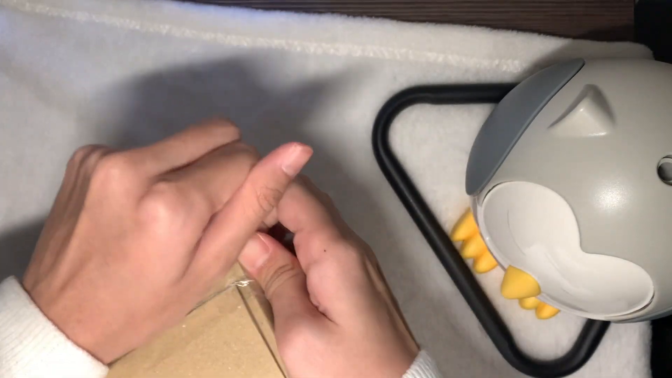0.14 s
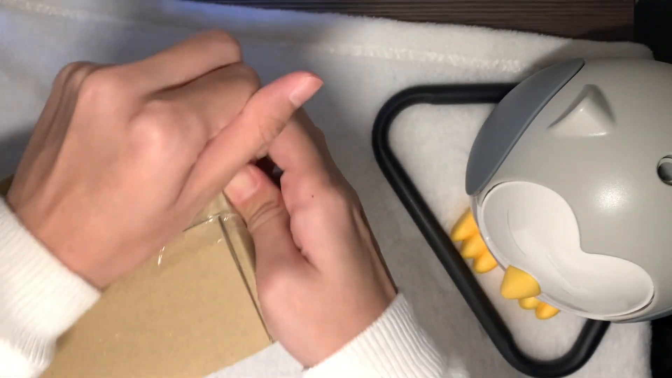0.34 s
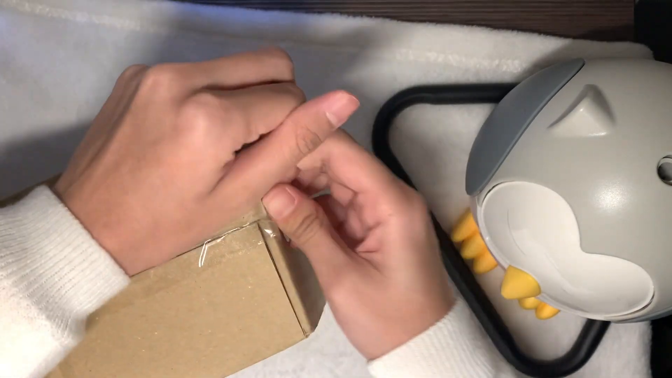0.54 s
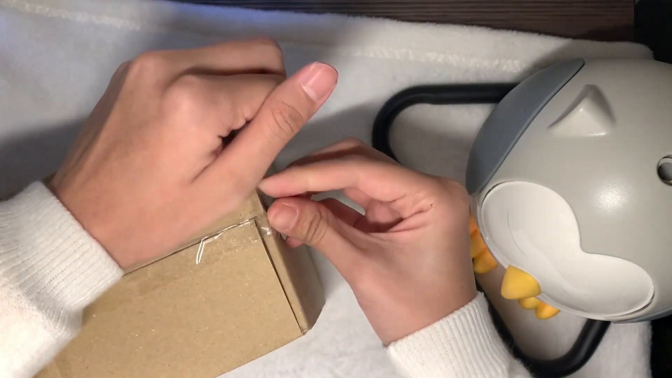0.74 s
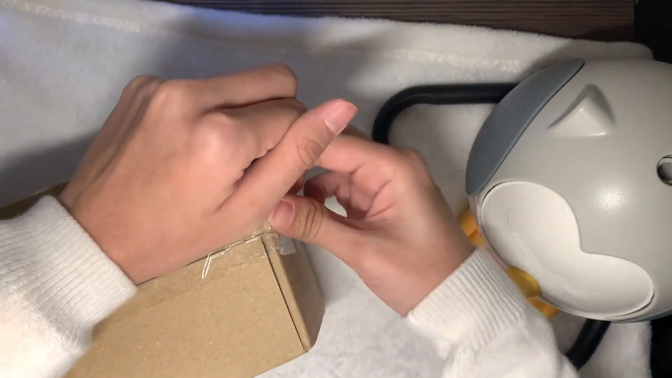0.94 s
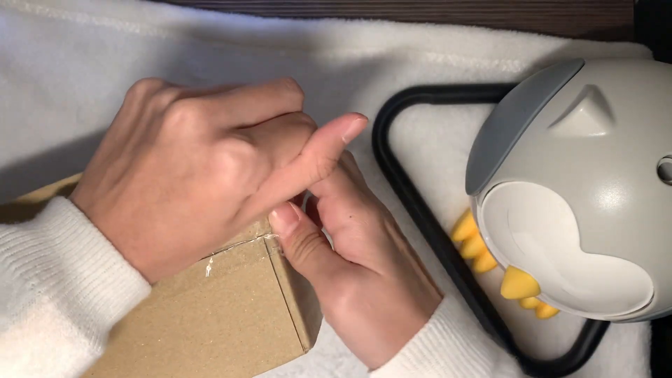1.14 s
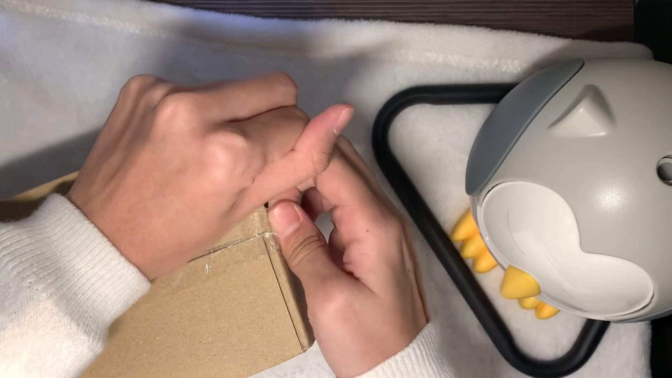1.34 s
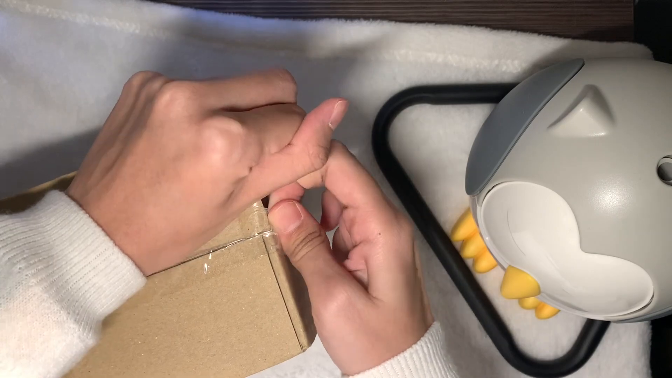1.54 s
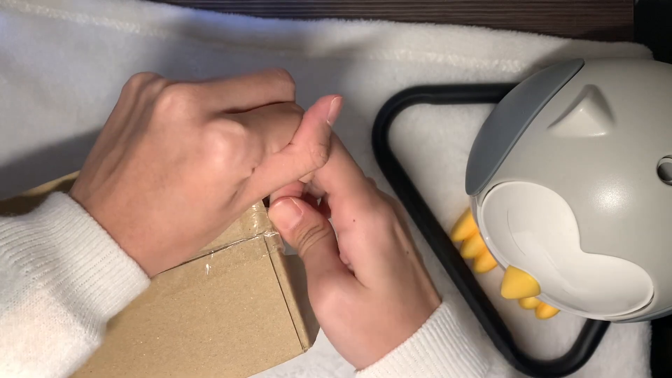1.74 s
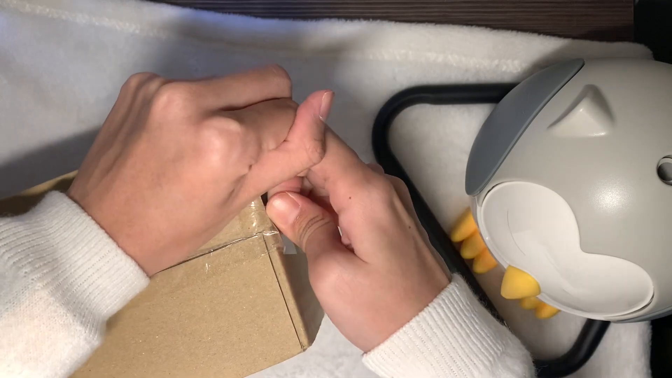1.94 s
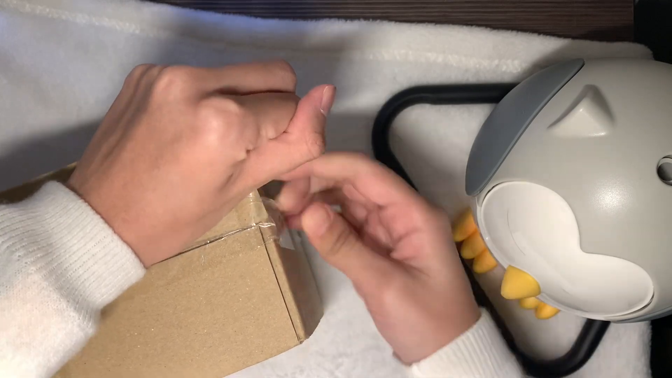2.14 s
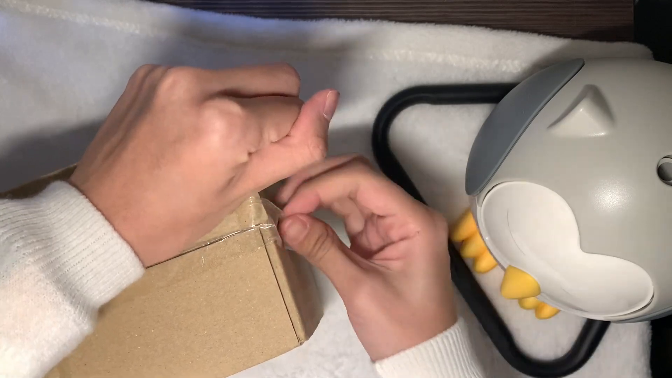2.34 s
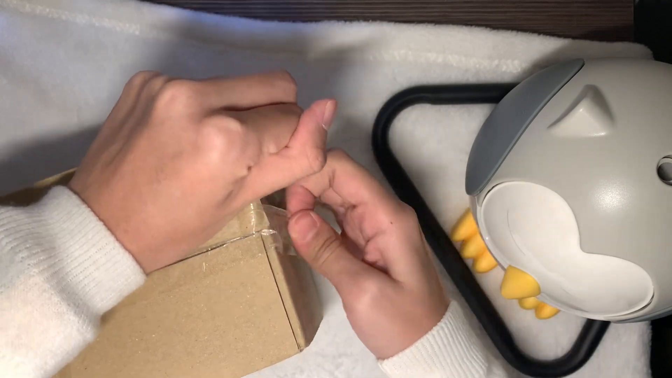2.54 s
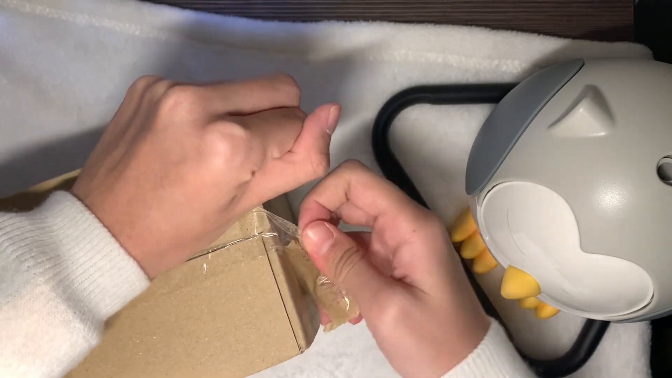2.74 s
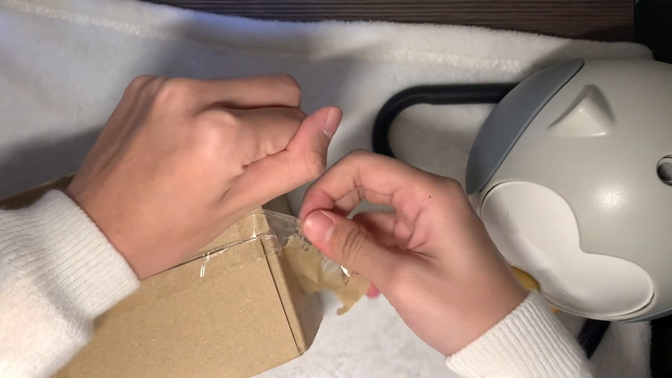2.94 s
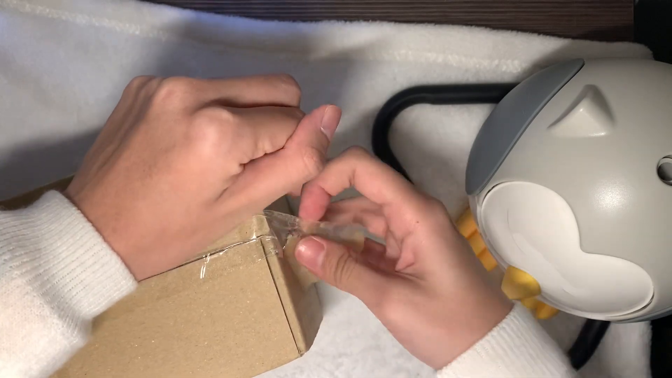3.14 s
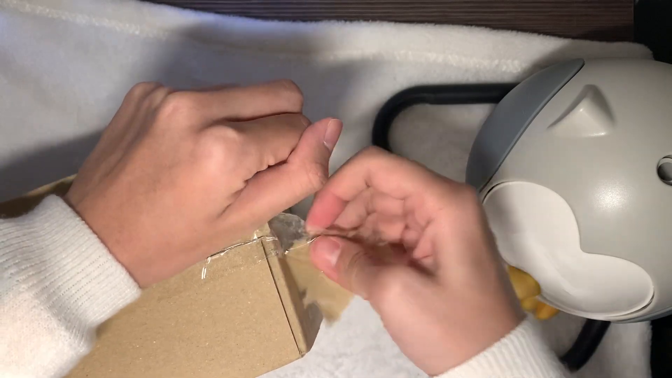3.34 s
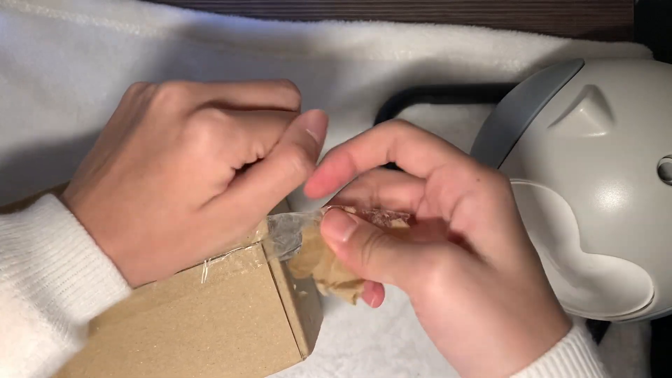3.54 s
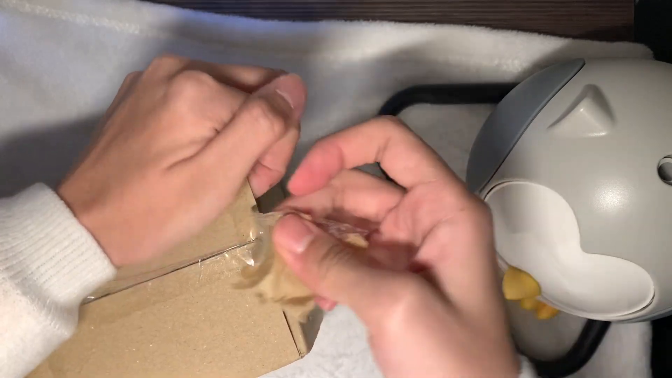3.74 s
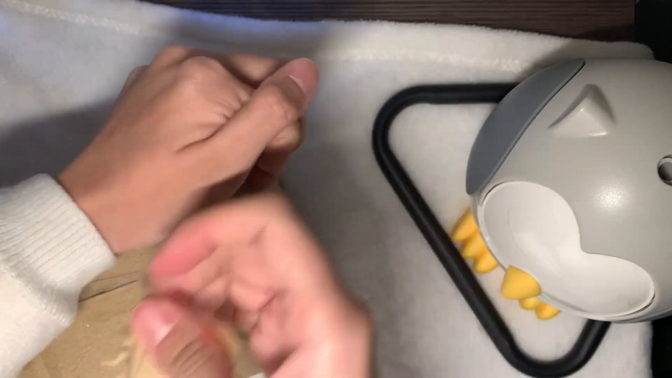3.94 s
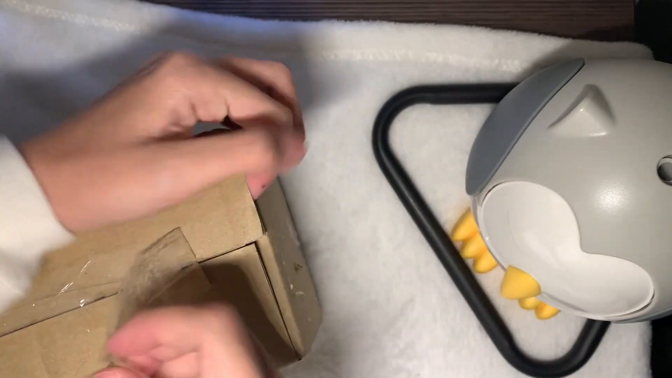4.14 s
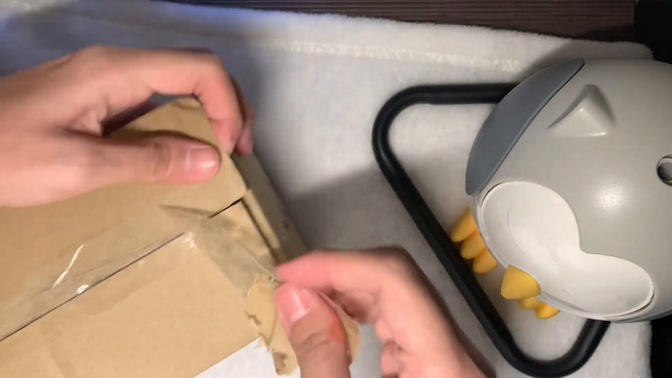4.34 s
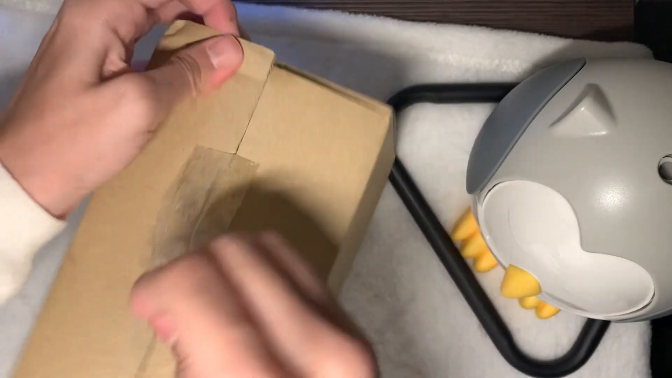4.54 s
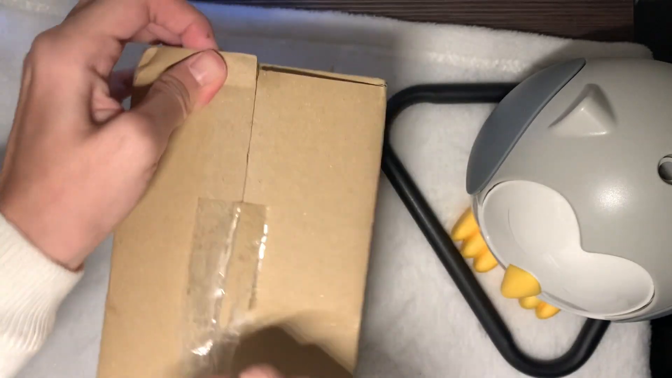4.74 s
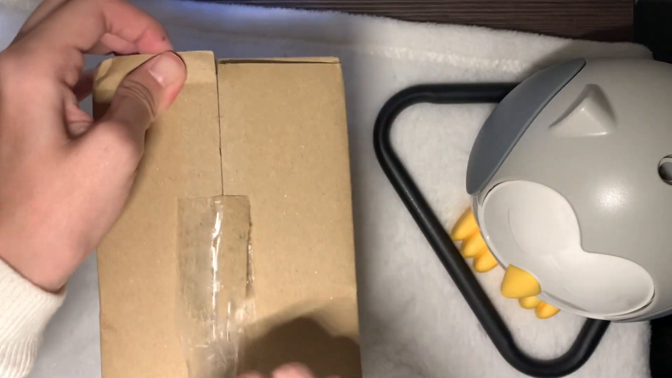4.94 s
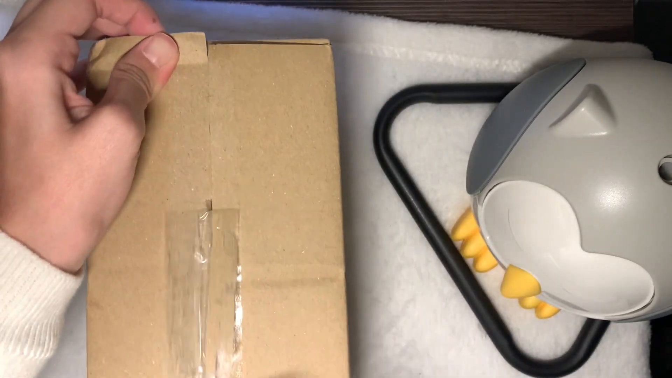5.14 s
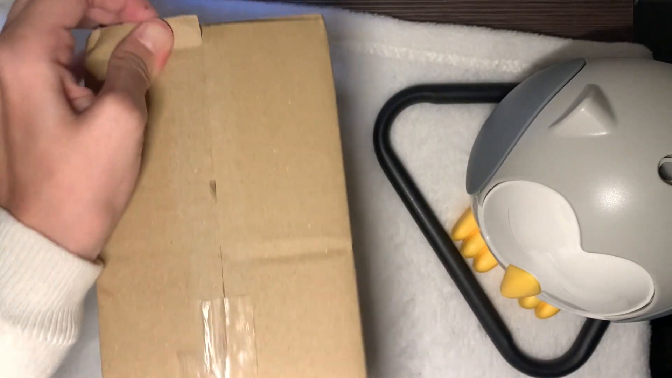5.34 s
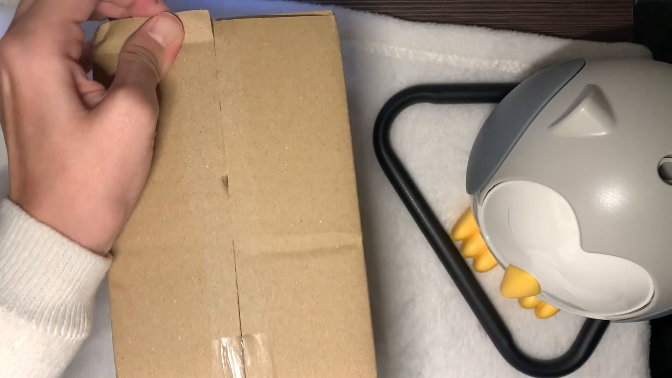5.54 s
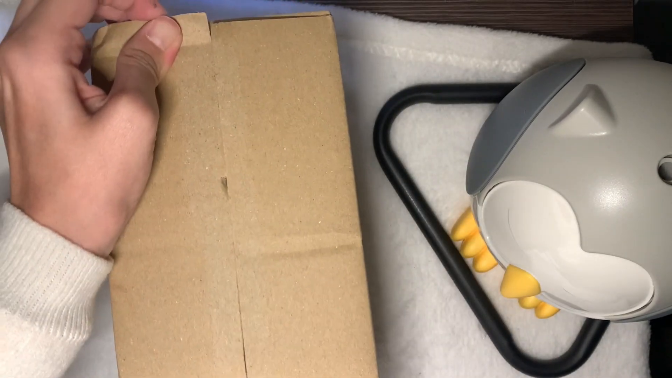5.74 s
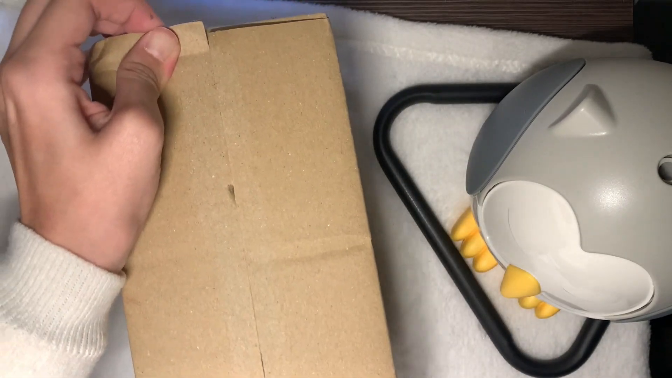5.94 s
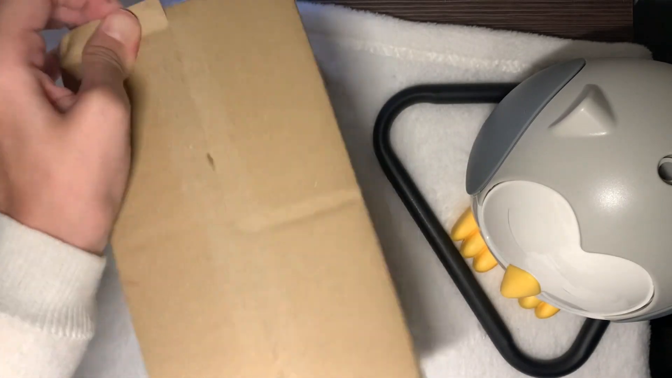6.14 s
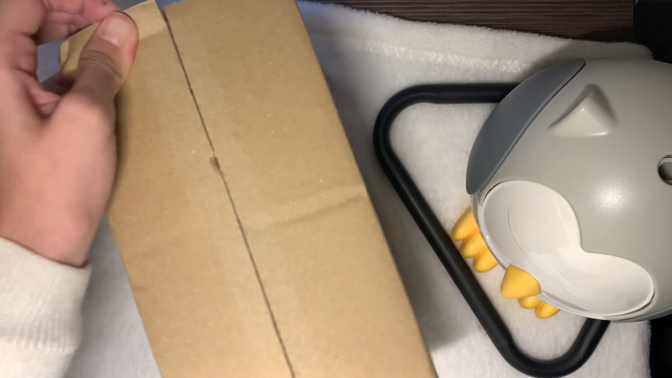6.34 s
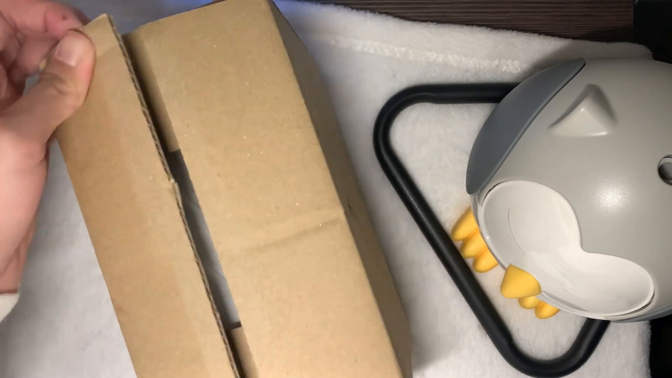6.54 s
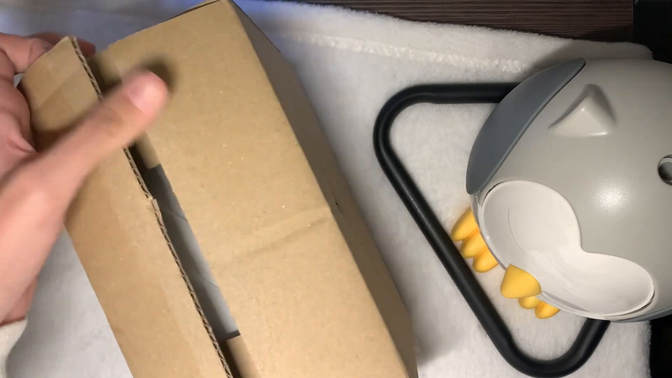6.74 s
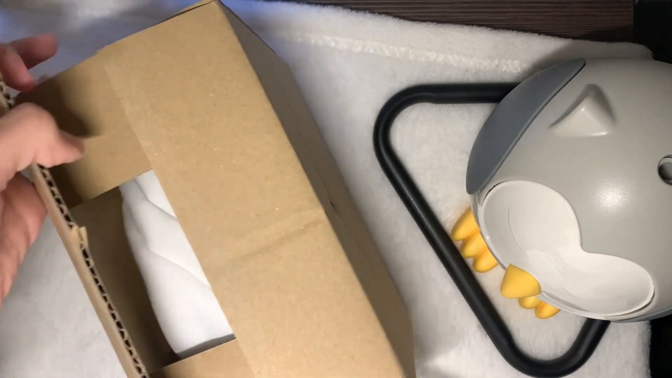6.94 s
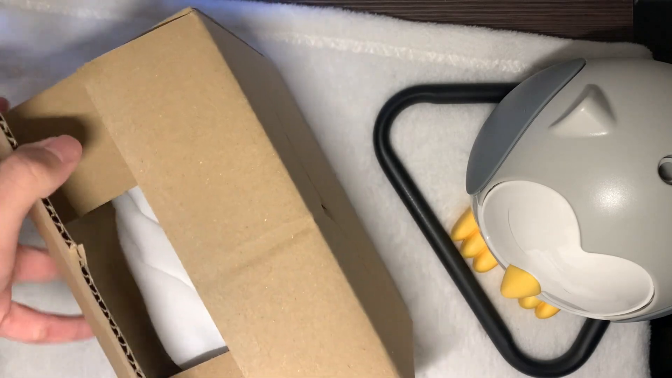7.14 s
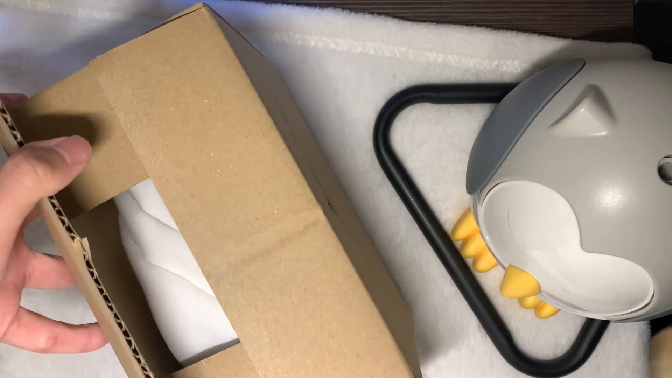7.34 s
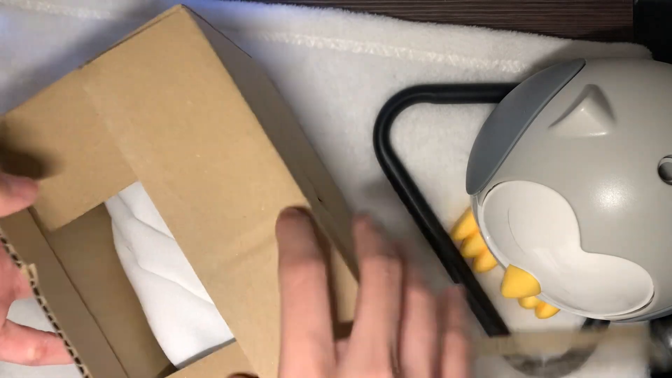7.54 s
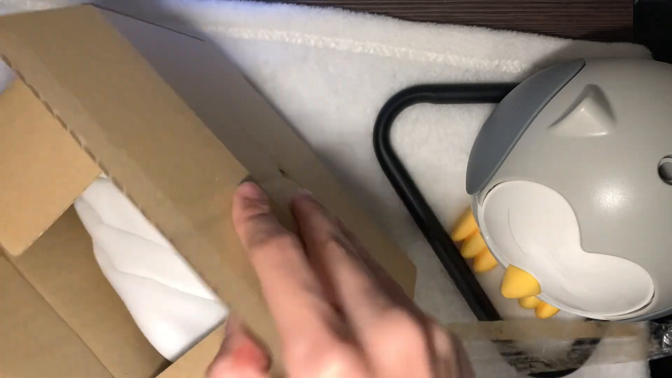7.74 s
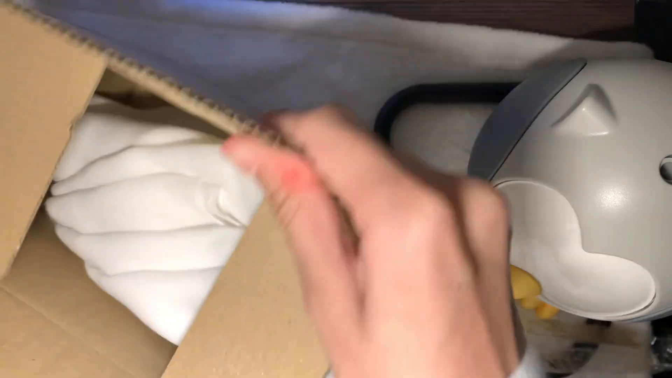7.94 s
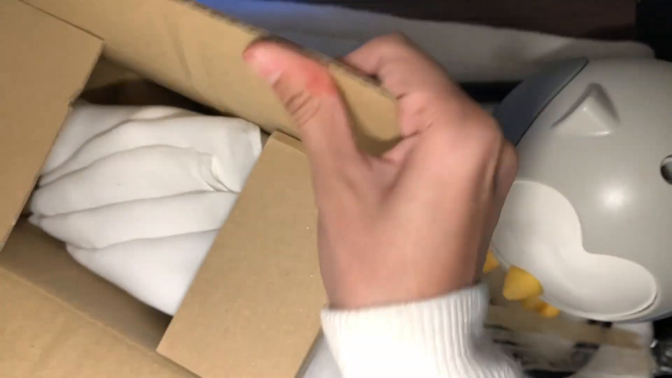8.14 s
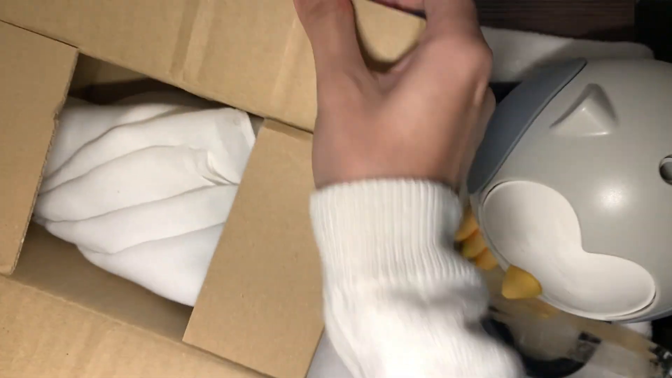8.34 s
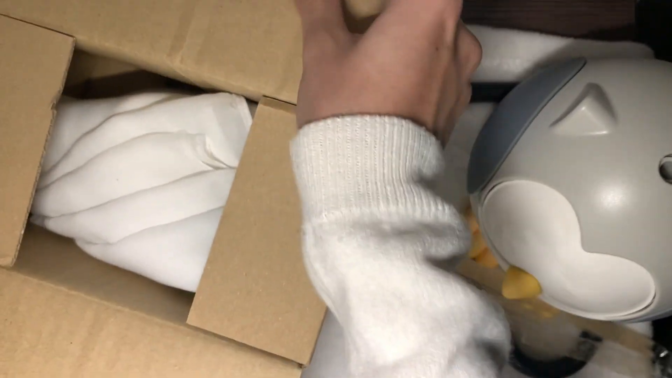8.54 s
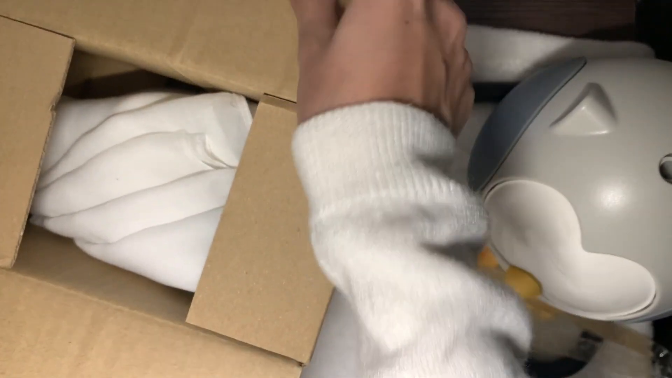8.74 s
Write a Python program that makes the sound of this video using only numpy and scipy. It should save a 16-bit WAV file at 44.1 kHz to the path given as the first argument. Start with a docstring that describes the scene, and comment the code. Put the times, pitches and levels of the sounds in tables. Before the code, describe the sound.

Hands work on a small cardboard box close to the microphone, in a small, soft room with a steady low hum. For the first 2.4 seconds, fingers rub and tap the cardboard while nails pick at packing tape with small, crisp ticks. Short rips follow at about 2.5, 3.2, 3.8 and 4.4 seconds, each a high, raspy fizz that drums on the hollow box, with knocks and snapping creases in between. From 5 seconds a longer, slower peel crackles along, with a sharp snap near 5.4, ending in two quick rips and thumps around 6 seconds. The loose tape crinkles near 6.5 seconds as the flaps begin to scrape and creak open. A firm cardboard knock and more crackles come at 7.5 seconds. The folds creak faintly around 8 seconds, and softer rubbing and light bumps continue until nearly 9 seconds.

```python
"""A small, soft room with a low hum. Close by, hands pick at the packing tape of a small cardboard box,
rip it off in several pulls and fold the flaps open. The glue lets go in tiny slips that fizz in the
film and drum on the board and lid. Creases in the loose tape snap, and the strip scratches over nails
and edges. Fingers and flaps rub and knock on the cardboard, and the folds creak as they bend back."""
import sys
import numpy as np
from scipy import signal
from scipy.fft import rfft, irfft, next_fast_len
from scipy.io import wavfile
from scipy.ndimage import uniform_filter1d

SR = 44100
rng = np.random.default_rng(int(sys.argv[2]) if len(sys.argv) > 2 else 0)


def int16_out(signal):
    """Quantize to a 16-bit WAV file."""
    q = np.round(np.clip(np.atleast_2d(signal).T, -1, 1) * 32767)
    wavfile.write(sys.argv[1], SR, q.astype(np.int16))


N = 387638

# Levels in the tables are relative; each layer sets its own trim.
# room tone: (frequency [Hz], level [dB])
AIR_EQ = [(20, -48), (45, 13), (70, 31), (120, -2.5), (200, -18), (420, 13.5), (700, -7.5), (1100, -4.5),
          (2000, -8.5), (4000, -20), (8000, -60), (16000, -48)]
# how two microphone ports differ: (frequency [Hz], phase lead of the left [rad], direct share [0-1])
PORT_PHASES = [(0, 0.1, 0), (480, 0.41, 0.2), (970, -0.83, .5), (1500, -1.61, 0.3), (2040, -1.89, .2),
               (2750, -2, 0), (3350, -1.63, 0.2), (5340, -1.64, .1), (6230, 0.5, .6), (9534, 3, .7),
               (13180, 6.5, 0.6), (16200, 8.5, .7)]
# tone of sliding skin, paper liner, a flipping crease and peeling film: (frequency [Hz], level [dB])
SKIN_EQ = [(700, -24), (2000, -9), (2800, -5.5), (4800, -7.5), (6300, -2), (8200, 5.5), (10000, 2.5),
           (11200, 10), (13000, 10), (14500, 12), (15700, 9), (16500, -25)]
PAPER_EQ = [(600, 8), (1100, 8.5), (2000, 10), (2800, 4), (4500, -2), (7000, 2), (10000, -18), (15000, -30)]
CREASE_EQ = [(700, -65), (2000, -15), (2800, -11.5), (4000, -3.5), (6300, 7.5), (8200, 16), (9800, 16.5),
             (11500, 14.5), (13000, 16.5), (15500, 14), (16800, -10)]
FILM_EQ = [(900, -73), (2000, 1), (2700, -11), (3600, -19.5), (5000, -22.5), (6300, -3), (8200, 5),
           (9200, 1), (10200, 1.5), (11200, 10), (13000, 9), (14500, 10.5), (15700, 4.5), (16500, -42)]
# resonances of the stiff board with the air inside, the flexing lid and a free flap:
# (frequency [Hz], bandwidth [Hz], level [dB])
BOARD_MODES = [(357.6, 78, 5.5), (427.2, 38.7, 12), (497.3, 26, 2), (611.6, 24.7, 2), (792, 58, -2.5),
               (975, 59, -1.5), (1190, 370, -13), (1439, 42, -4.5), (1994, 64, -10)]
LID_MODES = [(88, 19.4, 6), (128, 33.4, 3.5), (172, 20.4, 1.5), (209.2, 18.3, 4.5), (296, 103, -8)]
FLAP_MODES = [(216, 81, 13.5), (420, 60, -9.5), (622, 30, 1.5), (803, 43, 8), (1050, 94, 2),
              (1470, 38, 4.5), (2026, 103, 1)]
# narrow, wavering 3-6 kHz tones that give the peel a pitched rasp:
# (frequency [Hz], bandwidth [Hz], level [dB])
RASP_TONES = [(3255, 57, 0), (3623, 23, 3.5), (4020, 82, 0.5), (4520, 120, -3.5), (4840, 71, -0.5),
              (5390, 92, 1.5), (5970, 100, 3)]
# ring of a creaking fold and of scratched tape: (multiple of the pitch, bandwidth [Hz], level [dB])
FOLD_PARTIALS = [(.55, 90, -5.5), (1, 68.4, 7.5), (1.33, 110, -6), (1.86, 90, -3), (2.6, 160, -4)]
STRIP_PARTIALS = [(1, 188, 10), (1.19, 260, 5.5), (1.45, 300, 0), (1.9, 700, -15)]
# skin, sleeves and flaps brushing cardboard: (start [s], length [s], hiss [dB], board [dB], lid [dB])
STROKE_CUES = [(-0.002, 0.045, -72, -37, -60), (0.062, 0.16, -43, -56.5, -57.5),
               (0.913, 0.18, -47, -51, -51.5), (1.243, 0.35, -66, -50, -50.5),
               (1.51, 0.23, -30, -45.5, -49.5), (1.779, 0.16, -36, -51, -65), (2.047, 0.12, -42, -45, -42),
               (2.197, 0.39, -41, -47, -48.5), (2.26, 0.11, -38, -32, -42),
               (2.619, 0.057, -32.5, -41, -54.5), (2.74, 0.1, -43, -51, -67),
               (3.487, 0.1, -43.5, -46.5, -46.5), (3.668, 0.23, -46, -55.5, -54),
               (3.923, 0.048, -30.5, -51, -44), (4.043, 0.3, -42.5, -49.5, -52),
               (4.366, 0.15, -35, -53, -54), (4.643, .10, -56, -47, -50), (6.19, 0.23, -51, -51, -50),
               (6.37, 0.25, -45, -61, -54.5), (6.718, 0.088, -36, -48, -43), (6.84, 0.086, -38.5, -64, -55),
               (6.958, 0.17, -39.5, -62, -63), (7.462, 0.21, -41.5, -45.5, -44),
               (7.659, 0.56, -38.5, -49, -45.5), (8.249, 0.17, -45, -49.5, -48),
               (8.56, 0.19, -40, -50.5, -64)]
# the resting grip eases or firms: (time [s], half length [s], level change [dB])
GRIP_CUES = [(0.697, 0.082, -8), (4.866, 0.08, 4), (7.36, 0.19, -5.5)]
# fingers and flaps bumping the box: (time [s], panel swing [dB], settled pitch [Hz], ring [dB])
KNOCK_CUES = [(0.025, -35, 420, -33), (0.09, -37, 118, -29), (0.131, -39, 440, -31), (0.822, -33, 315, -28),
              (0.948, -26.5, 360, -35), (1.121, -43, 407, -27.5), (1.165, -32.5, 220, -32.5),
              (1.253, -55, 300, -31), (1.34, -45, 364, -28.5), (1.438, -47, 414, -31),
              (1.518, -32, 414, -23.5), (1.645, -20.5, 386, -32), (2.12, -37, 436, -18.5),
              (2.127, -23, 198, -34), (2.277, -22, 361, -35), (2.473, -19.5, 517, -24),
              (2.566, -15, 520, -8.5), (2.852, -31.5, 278, -30), (2.947, -40, 124, -26),
              (3.086, -16, 348, -28), (3.097, -22.5, 420, -46), (3.122, -15, 410, -42),
              (3.152, -25, 407, -12), (3.274, -16, 497, -18.5), (3.476, -27, 195, -23.5),
              (3.671, -27.5, 335, -26), (3.838, -33, 280, -21.5), (3.868, -15, 245, -19.5),
              (3.881, -21.5, 85.6, -43), (4.116, -31.5, 116, -40), (4.288, -28.5, 107, -26.5),
              (4.479, -7.5, 312, -14), (4.522, -12, 165, -41), (4.56, -22, 90.5, -45),
              (4.688, -27.5, 330, -35), (5.197, -10.5, 199, -28), (5.237, -16, 298, -20),
              (5.265, -20, 380, -32), (5.289, -17, 445, -16.5), (5.424, -13, 152, -48),
              (5.636, -19.5, 138, -44), (6.042, -10, 142, -26), (6.076, -22, 138, -33),
              (6.135, -5, 397, -28), (6.455, -61, 436, -23.5), (6.607, -14.5, 136, -41),
              (6.734, -22.5, 136, -36), (6.903, -52, 388, -36), (7.495, -8, 219.6, -14.5),
              (7.504, -17.5, 141, -34), (7.528, -15.5, 180, -22), (7.648, -27, 226, -25.5),
              (8.037, -29.5, 152, -26), (8.121, -28, 209, -31.5), (8.391, -29.5, 294, -30.5)]
# folds creaking and tape scratching: (peak time [s], build [s], level [dB], pitch [Hz])
CREAK_CUES = [(6.603, 0.0021, -37, 1000), (6.79, 0.014, -53, 1090), (6.906, 0.0026, -46.5, 1110),
              (7.62, 0.0052, -44, 770), (7.638, 0.005, -41, 820), (7.652, 0.0044, -38, 753),
              (7.73, 0.01, -47, 825), (7.762, 0.015, -43, 640), (8.004, 0.0084, -46.5, 820),
              (8.04, 0.0055, -42.5, 830), (8.062, 0.0046, -50, 780), (8.095, 0.0048, -44, 800),
              (8.126, 0.0044, -44, 830), (8.153, 0.004, -48, 802)]
SCRATCH_CUES = [(0.098, 0.0061, -45, 1810), (0.2, 0.0027, -47, 2020), (1.124, 0.0025, -48, 1970),
                (1.17, 0.0017, -41.5, 1930), (1.343, 0.0014, -44, 1950), (1.648, 0.0023, -38, 3320),
                (1.825, .002, -43, 3300), (2.128, 0.0045, -31, 1440), (2.484, 0.0076, -37.5, 4200),
                (2.511, 0.017, -39.5, 3470), (3.865, .012, -34.5, 1380), (5.946, 0.0044, -38.5, 1540),
                (6.078, 0.0072, -38, 2000), (6.588, 0.0028, -47, 3140), (7.607, 0.0042, -46.5, 4160),
                (8.768, 0.013, -46.5, 1480)]
# creases snapping, nails catching an edge:
# (time [s], crack [dB], pitch [Hz], board [dB], shiver share before limiting [0-1])
SNAP_CUES = [(0.199, -44, 12000, -39.5, 0.6), (0.237, -41, 12000, -39, 0), (0.281, -35, 10000, -38.5, 0.8),
             (0.32, -39, 10000, -57, 0.4), (0.494, -48, 12500, -58, 0.4), (0.536, -44, 12000, -40, 0.6),
             (0.586, -44, 12000, -41.5, 0.9), (0.604, -39, 12100, -64, 0.5), (0.822, -44, 12000, -42, 0.6),
             (0.8446, -30, 12200, -35, 1), (0.9205, -29, 13600, -69, 0), (0.978, -37, 11500, -66, 0),
             (1.058, -32.5, 11000, -60, 0.4), (1.086, -28, 10000, -66, 0.3), (1.123, -42, 11000, -41, 0.4),
             (1.15, -41, 12000, -53, .2), (1.167, -34.5, 8850, -41, 0.9), (1.186, -38, 9000, -44, 0.9),
             (1.2, -37.5, 13500, -58, 0), (1.255, -58, 12000, -38, .2), (1.341, -37.5, 11000, -41, 1),
             (1.441, -57, 12000, -42, .3), (1.52, -21.5, 14100, -59, 0), (1.5359, -15.5, 11100, -56, 0),
             (1.646, -26, 14100, -24.5, 0.4), (1.689, -18, 12900, -57, 0.5),
             (1.824, -23.5, 10200, -55, 0.3), (1.813, -21.5, 11800, -64, 1), (1.878, -26, 13100, -66, .2),
             (1.911, -26.5, 12500, -66, 0.1), (2.0337, -30.5, 14200, -52, 0.8),
             (2.0794, -26, 12000, -62, 0.6), (2.0635, -19, 10000, -32.5, 0.1),
             (2.0993, -22.5, 12700, -44, 0.3), (2.125, -20, 12700, -50, 0), (2.426, -16, 12100, -53, 0.6),
             (2.6952, -10.5, 9900, -39, 0), (2.7237, -22, 11700, -42, 0.7), (2.768, -26, 11000, -47.5, 1),
             (2.9087, -30, 11200, -41, 1), (2.952, -26.5, 13500, -29.5, 0.2), (2.977, -21, 10900, -34.5, 1),
             (3.063, -22, 13100, -31, 0.3), (3.389, -23, 11000, -32.5, 0), (3.475, -27, 12300, -28.5, 0.5),
             (3.5146, -25, 12300, -33, 0), (3.659, -25.5, 14400, -30, 0.5), (3.768, -26, 14400, -42.5, 0.7),
             (3.97, -21, 12000, -35, 0), (4.085, -31, 12000, -35, 0), (4.1196, -21, 12400, -33.5, 0.1),
             (4.162, -29.5, 11900, -44, 0.8), (4.361, -27, 12000, -32.5, 0), (4.2369, -20, 13200, -35, 0.7),
             (4.2894, -20, 14400, -25.5, 0), (4.8109, -27.5, 13300, -48, 0),
             (4.8315, -17, 13600, -38, 0.23), (4.995, -17, 14600, -49, 0.1),
             (5.165, -14.5, 12300, -45, 0.86), (5.321, -13.5, 11900, -51, 0.1),
             (5.42, -8, 9900, -14.5, 0.65), (5.5353, -23, 12200, -42, 0), (5.739, -17.5, 12600, -65, 0),
             (5.783, -23, 12300, -50, 0), (5.8348, -18.5, 9600, -61, 0), (5.855, -26, 11500, -26, 0),
             (5.9007, -15, 13300, -38.5, 0.02), (6.2978, -32, 11100, -44, 1), (6.3868, -26, 10900, -40, 1),
             (6.429, -22.5, 10600, -40, 0.2), (6.4572, -21.5, 13000, -29, 0),
             (6.4622, -20, 10900, -29, 0.4), (6.494, -23.5, 10500, -40, 0.6), (6.523, -21, 10100, -44, 1),
             (6.579, -29, 11400, -36, 1), (6.587, -20.5, 11500, -38, 1), (6.627, -28.5, 11000, -39, 1),
             (6.8817, -29.5, 12100, -36.5, 1), (7.2, -45, 12000, -53, 0.4),
             (7.3027, -34.5, 11800, -46, 0.6), (7.4756, -30.5, 12600, -36.5, 0.3),
             (7.496, -20, 12000, -34, 0), (7.5283, -19.5, 13000, -30, 0.25), (7.5954, -24, 12900, -33, 0.4),
             (7.606, -16.5, 11200, -33, 0.6), (8.393, -34, 11100, -43, 1)]
# one long, slow peel down the seam: (time [s], film fizz [dB], board [dB], lid [dB])
PEEL_CURVE = [(4.952, -34.5, -47, -39.5), (5.12, -28.5, -53, -27.5), (5.22, -22.5, -39.5, -22.5),
              (5.285, -23, -27, -23), (5.35, -32, -48, -33.5), (5.48, -40.5, -72, -41.5),
              (5.645, -34.5, -44, -32), (5.78, -38.5, -55, -39), (5.94, -45, -91, -72)]
# short rips of tape: (start [s], build [s], hold [s], release [s], film fizz [dB], board [dB], lid [dB],
# shift from lid to board as the peeling edge nears a stiff corner [dB])
RIP_CUES = [(2.454, 0.061, 0.05, 0.21, -19, -23, -37, 10.5),
            (3.104, 0.069, 0.0083, 0.1, -33.5, -28.5, -30, -17),
            (3.206, 0.098, 0.041, 0.12, -18.5, -26.5, -38.5, -6.5),
            (3.82, 0.027, 0.031, 0.28, -24.5, -34, -31.5, 1),
            (4.427, 0.048, 0.075, 0.41, -24, -41, -24, -1.5),
            (5.917, 0.15, 0.047, 0.074, -21.5, -28, -24, 8),
            (6.07, 0.034, 0.045, 0.13, -22.5, -21, -29.5, 7.5)]

OPENING_S, OPEN_S = 6.65, 6.75  # the flaps come free between these times
TOP_HZ = 15950


def undb(db):
    """Decibels to gain."""
    return 10 ** (np.asarray(db) / 20)


def unit(x):
    """Scale to rms 1."""
    return x / np.sqrt(np.mean(x ** 2))


def peak(x):
    """Scale to peak 1."""
    return x / np.abs(x).max()


def burst(x):
    """Scale to the energy of one millisecond at rms 1."""
    return x * np.sqrt(SR / 1000 / np.sum(x ** 2))


def steady(x):
    """Ride the level over a thirtieth of a second; the grain stays."""
    return x / np.sqrt(uniform_filter1d(x ** 2, SR // 30) + 1e-4 * np.mean(x ** 2))


def add(out, s, sound):
    """Mix a sound in at a time."""
    i = max(int(s * SR), 0)
    out[i:i + len(sound)] += sound[:N - i]


def ring(x, response):
    """Pass a drive through an impulse response."""
    return signal.oaconvolve(x, response)[:N]


def filtered(x, kind, hz, order):
    """A plain low-pass or high-pass."""
    return signal.sosfilt(signal.butter(order, hz, kind, fs=SR, output="sos"), x)


def gains(eq, size):
    """An EQ curve as gains on the bins of an FFT."""
    hz, db = np.transpose(eq)
    return undb(np.interp(np.log(np.fft.rfftfreq(size, 1 / SR) + 1), np.log(hz), db))


def click(eq, size=1024):
    """A minimum-phase click shaped by an EQ curve; so small a source radiates no bass."""
    hz = np.fft.rfftfreq(size, 1 / SR) + 1
    cepstrum = irfft(np.log(gains(eq, size) * hz / np.hypot(hz, eq[0][0])))
    cepstrum[1:size // 2] *= 2
    cepstrum[size // 2 + 1:] = 0
    return irfft(np.exp(rfft(cepstrum)))


def modes(table, spread_db=0):
    """Damped sines; spread_db varies their balance, as a new point of contact would."""
    out, t = 0, np.arange(SR // 6) / SR
    for k, (hz, width, db) in enumerate(table):
        gain = (-1) ** k * undb(db + spread_db * rng.standard_normal()) * width
        out = out + gain * np.exp(-np.pi * width * t) * np.sin(2 * np.pi * hz * t)
    return out


def walk(rate):
    """A random modulator with a spread near 1, gliding to `rate` new values a second."""
    return np.interp(np.arange(N) / SR * rate, np.arange(20000), rng.standard_normal(20000))


def puff(decay_s):
    """A puff of noise that dies away."""
    t = np.arange(SR // 6) / SR
    return burst(rng.standard_normal(len(t)) * np.exp(-t / decay_s))


def slips(per_s, scatter_db, catch_rate, catch_db):
    """Stick-slip: tiny releases of uneven size, surging as the contact catches and runs."""
    fired = rng.random(N) < per_s / SR
    size = undb(scatter_db * np.clip(rng.standard_normal(N), -2, 2) + catch_db * walk(catch_rate))
    return fired * size * rng.choice([-1, 1], N)


def room_tone(hum_hz=49.3, hum_db=-41.5, air_db=-55.5):
    """The bed: a slightly wavering appliance hum over still air."""
    phase = 2 * np.pi * np.cumsum(hum_hz + .5 * walk(3.19)) / SR
    hum = undb(hum_db + 0.27 * walk(5)) * unit(np.sin(phase))
    air = irfft(rfft(rng.standard_normal(N)) * gains(AIR_EQ, N), N)
    return hum + undb(air_db) * unit(air)


def reflections(x, t60_s, wet_db):
    """Two different diffuse tails of one sound."""
    t = np.arange(SR // 3) / SR
    tails = rng.standard_normal((2, len(t))) * np.exp(-np.log(1000) * t / t60_s) * (t > t60_s / 100)
    return undb(wet_db) * np.array([ring(x, tail / np.linalg.norm(tail)) for tail in tails])


def scattering(x, pairs=2):
    """Hands and flaps throw back the highs; the echoes shift as they move."""
    highs = filtered(x, "high", 800, order=2)
    return sum(walk(6) * echo for _ in range(pairs) for echo in reflections(highs, .025, wet_db=-16))


def stereo_ports(x, smear_s=0.0022, left_db=-1.0):
    """Two microphone ports hear a sound out of step; nearby surfaces smear part of the difference."""
    size = next_fast_len(N + SR // 6, real=True)
    hz, *columns = np.transpose(PORT_PHASES)
    lead, direct = (np.interp(np.fft.rfftfreq(size, 1 / SR), hz, column) for column in columns)
    smear = np.exp(1j * np.angle(rfft(puff(smear_s), size)))
    spectrum = rfft(x, size)
    mid = irfft(spectrum * np.cos(lead / 2), size)[:N]
    difference = spectrum * np.sin(lead / 2)
    diffuse = difference * smear * np.sqrt(1 - direct ** 2)
    turn = 3 * walk(9)  # the smeared part turns in phase as the hands move
    smeared = np.cos(turn) * irfft(diffuse, size)[:N] + np.sin(turn) * irfft(1j * diffuse, size)[:N]
    side = irfft(1j * direct * difference, size)[:N] + smeared
    return np.array([undb(left_db) * (mid + side), mid - side])


def hand_pressure(attack_s=0.025, release_s=0.033, sag_db=1.5, fidget_db=-6.5, flutter_db=2):
    """Envelopes of hiss, board and lid: strokes bite, sag and fade over a restless light grip."""
    t = np.arange(N) / SR
    grip_db = sum(db * np.exp(-((t - s) / half) ** 2) for s, half, db in GRIP_CUES)
    resting = undb([-61, -57.5, -55.5])  # hiss, board, lid
    out = np.outer(resting, undb(fidget_db * walk(3.9) + grip_db))
    for start, length, *levels_db in STROKE_CUES:
        age = t - start
        done = np.clip(age / length, 0, 1)
        contact = np.clip(age / attack_s, 0, 1) * np.exp(-np.maximum(age - length, 0) / release_s)
        out = np.maximum(out, np.outer(undb(levels_db), contact * undb(-sag_db * done)))
    return out * undb(flutter_db * walk(24))  # skin grips and slides unevenly


def rubbing(flap_share=0.71):
    """Skin and flaps drag over paper fibres: fine hiss, stray ticks, coarse catches that stir the box."""
    hiss, board, lid = hand_pressure()
    opened = np.interp(np.arange(N) / SR, [OPENING_S, OPEN_S], [0, 1])
    fibres = slips(per_s=9000, scatter_db=3.5, catch_rate=120, catch_db=1.8)
    catches = slips(per_s=700, scatter_db=0.5, catch_rate=46, catch_db=11.0)
    nails = slips(per_s=60, scatter_db=4, catch_rate=9, catch_db=4)
    flap_slips = slips(per_s=300, scatter_db=3.5, catch_rate=26, catch_db=2)
    # nails tick on the tape while the box is shut
    ticks = (1 - opened) * undb(-10) * unit(ring(nails, click(CREASE_EQ)))
    surface = undb(-4.0) * steady(ring(fibres, click(SKIN_EQ))) + ticks
    # the closed box rings as a whole; an open flap rings by itself
    free = opened * flap_share
    box = np.sqrt(1 - free) * steady(ring(catches, modes(BOARD_MODES)))
    flap = np.sqrt(free) * unit(ring(flap_slips, modes(FLAP_MODES)))
    # the cut edge of a free flap adds dry scrape
    liner = (undb(-18.0) + undb(-23) * opened) * steady(ring(catches, click(PAPER_EQ)))
    boom = undb(2.5) * steady(ring(catches, modes(LID_MODES)))
    return hiss * surface + board * (box + flap + liner) + lid * boom


def juddering(cues, partials, slips_per_s, release_s, jitter=.22, scatter_db=3.5, count=90):
    """Short runs of nearly even slips that build and break off, each run ringing at its own pitch."""
    out, t = np.zeros(N), np.arange(SR // 8) / SR
    middle_s = t[-1] / 2
    for s, build, db, hz in cues:
        spacing, scatter = rng.standard_normal((2, count))
        times = np.cumsum(np.exp(jitter * spacing)) / slips_per_s
        times = times - times[count // 2]
        sizes = undb(scatter_db * scatter) * np.exp(-np.maximum(-times / build, times / release_s))
        run = np.histogram(times + middle_s, t, weights=sizes)[0]
        body = modes([(min(ratio * hz, TOP_HZ), width, level) for ratio, width, level in partials])
        gain = undb(db) * np.sqrt(1000 * (build + release_s))  # longer runs carry more energy
        add(out, s - middle_s, gain * burst(signal.fftconvolve(run, body)))
    return out


def creaking():
    """The folds of the flaps give way in jerks as they are bent back."""
    return juddering(CREAK_CUES, FOLD_PARTIALS, slips_per_s=280, release_s=0.0061)


def scratching():
    """Dragged over a nail or an edge, a short length of tape judders and rings."""
    return juddering(SCRATCH_CUES, STRIP_PARTIALS, slips_per_s=700, release_s=0.0042)


def cardboard_tap(table, paper_db, paper_s, edge_hz):
    """Cardboard struck once: its modes ring and the liner gives a dry crack, dulled above edge_hz."""
    crack = signal.fftconvolve(puff(paper_s), click(PAPER_EQ))[:SR // 6]
    crack = filtered(crack, "low", edge_hz, order=4)
    body = modes(table, spread_db=4)
    return burst(burst(body) + undb(paper_db) * burst(crack))


def knocking(cycles=1.8, push_s=0.001596, sweep=0.85, sweep_s=0.0018, panel_db=-2.5, board_db=-3.0):
    """A bumped panel thumps for a few cycles and rings the box, or a flap once the box is open."""
    out, t = np.zeros(N), np.arange(SR // 6) / SR
    for s, db, hz, ring_db in KNOCK_CUES:
        # short bending waves run ahead of long ones, so the pitch drops at first
        phase = 2 * np.pi * np.cumsum(hz * (1 + sweep * np.exp(-t / sweep_s))) / SR
        swing = np.sin(phase) * np.exp(-t * hz / cycles) * (1 - np.exp(-t / push_s))
        struck = BOARD_MODES if s < OPEN_S else FLAP_MODES
        tap = cardboard_tap(struck, paper_db=-15.0, paper_s=0.035, edge_hz=2930)
        add(out, s, undb(db + panel_db) * peak(swing))
        add(out, s + push_s, undb(ring_db + board_db) * peak(tap))
    return out


def crinkle(per_s=450, spread_s=0.016, size=SR // 12):
    """The film gives way in little steps just before and after a snap, which falls in the middle."""
    t = (np.arange(size) - size // 2) / SR
    steps = (rng.random(size) < per_s / SR) * rng.standard_normal(size)
    return burst(steps * np.exp(-np.abs(t) / spread_s) + 1e-9)


def snapping(crack_s=0.00021, shiver_s=0.0033, crack_db=1, board_db=-2.5, noise_db=-2, crinkle_db=-16.5):
    """A crease flips over with a pitched crack; the film shivers briefly and the board answers."""
    out, crease, t = np.zeros(N), click(CREASE_EQ), np.arange(SR // 6) / SR
    for s, db, hz, ring_db, share in SNAP_CUES:
        share = np.clip(share, .02, .9)
        ping = burst(np.sin(2 * np.pi * hz * t) * np.exp(-t / crack_s))
        crack = burst(ping + undb(noise_db) * puff(crack_s))
        flip = np.sqrt(1 - share) * crack + np.sqrt(share) * puff(shiver_s)
        add(out, s, undb(db + crack_db) * burst(signal.fftconvolve(flip, crease)))
        steps = crinkle()
        add(out, s - len(steps) / SR / 2, undb(db + crinkle_db) * burst(signal.fftconvolve(steps, crease)))
        tap = cardboard_tap(BOARD_MODES, paper_db=27.0, paper_s=0.009, edge_hz=9600)
        add(out, s, undb(ring_db + board_db) * tap)
    return out


def wavering(drive, table, low_hz, rate=14, drift=.018, swell_db=3):
    """A bank of narrow band-passes: each band swells, fades and drifts in pitch by itself."""
    out, samples = 0, np.arange(N, dtype=float)
    for hz, width, db in table:
        playhead = np.cumsum(1 + drift * walk(rate)) % N
        rung = signal.lfilter(*signal.iirpeak(hz, hz / width, fs=SR), drive)
        out = out + undb(db + swell_db * walk(rate)) * np.interp(playhead, samples, rung)
    return steady(filtered(out, "high", low_hz, order=3))


def tape_pull(grab_s=0.014, build_db=19, release_db=64.5):
    """Envelopes of film, board and lid: one long peel, and rips that tighten, hold and go slack."""
    t = np.arange(N) / SR
    times, *columns = np.transpose(PEEL_CURVE)
    gate = np.clip(np.minimum(t - times[0], times[-1] - t) / grab_s, 0, 1)
    out = gate * undb([np.interp(t, times, db) for db in columns])
    for start, build, hold, release, fizz_db, board_db, lid_db, shift_db in RIP_CUES:
        age = t - start
        rise_db = build_db * np.minimum(age / build - 1, 0)
        swell_db = rise_db - release_db * np.maximum((age - build - hold) / release, 0)
        corner_db = shift_db * np.clip((age - build - hold / 2) / (build + hold), -.5, .5)
        rip = undb([fizz_db + swell_db, board_db + swell_db + corner_db, lid_db + swell_db - corner_db])
        out = np.maximum(out, np.clip(age / grab_s, 0, 1) * rip)
    return out


def peeling(judder_hz=300.5, wander=.35, judder_db=3.5, rasp_db=-15.5, crackle_db=-15):
    """Glue threads break in quick waves: each clicks in the film and tugs at the board and the lid."""
    fizz, board, lid = tape_pull()
    waves = np.cos(2 * np.pi * np.cumsum(judder_hz * np.exp(wander * walk(14))) / SR)
    threads = slips(per_s=9000, scatter_db=4.5, catch_rate=130, catch_db=3)
    breaks = unit(threads * undb(judder_db * waves))
    film = undb(1.0) * fizz * steady(ring(breaks, click(FILM_EQ)))
    # a pitched rasp, strongest when film and board are both loud
    rasp = undb(rasp_db) * np.sqrt(fizz * board) * wavering(breaks, RASP_TONES, low_hz=1800)
    # tiny creases flick out of the pulled strip
    flicks = slips(per_s=76, scatter_db=5, catch_rate=22, catch_db=2)
    crackle = undb(crackle_db) * fizz * unit(ring(flicks, click(CREASE_EQ)))
    # the heavy box also feels whole patches letting go, and hardly follows the fastest jolts
    patches = slips(per_s=210, scatter_db=0.5, catch_rate=26, catch_db=1.0)
    tugs = filtered(breaks + undb(-7) * unit(patches), "low", 2300, order=4)
    # its ring shifts as the peeling edge travels
    drum = board * wavering(tugs, BOARD_MODES, low_hz=306)
    boom = undb(-2.0) * lid * wavering(tugs, LID_MODES, low_hz=70)
    return film + rasp + crackle + drum + boom


def scene():
    """The box up close in stereo, over the room tone, with a short, soft tail."""
    box = peeling() + rubbing() + snapping() + knocking() + creaking() + scratching()
    room = reflections(box, t60_s=0.072, wet_db=-21.0)
    return stereo_ports(box + scattering(box) + room_tone()) + room


def record(dry):
    """Soft-clip the loudest peaks and cut the top steeply."""
    return signal.sosfilt(signal.ellip(8, .2, 70, TOP_HZ, fs=SR, output="sos"), np.tanh(dry))


dry = scene()
out = record(dry)
int16_out(out)
```